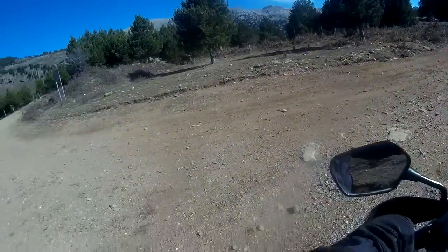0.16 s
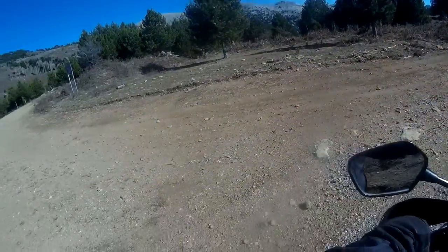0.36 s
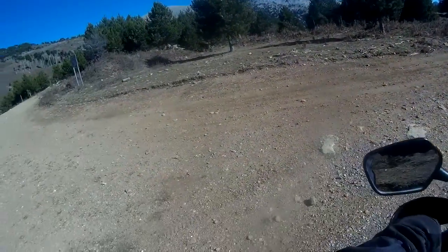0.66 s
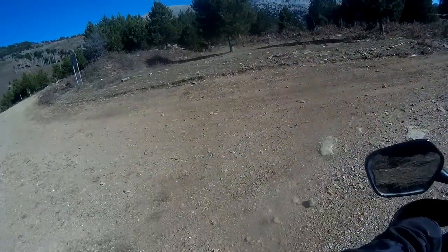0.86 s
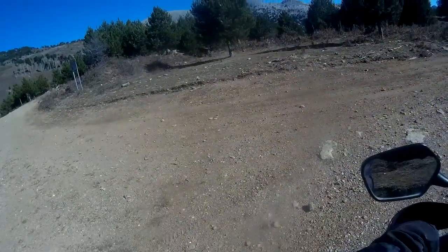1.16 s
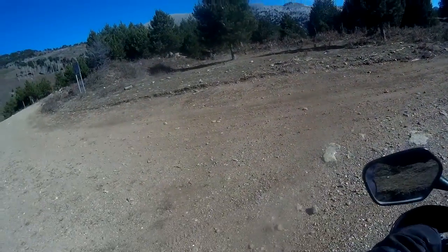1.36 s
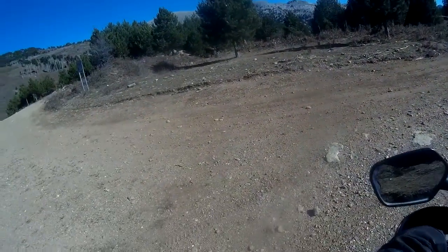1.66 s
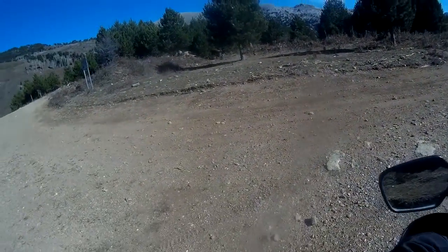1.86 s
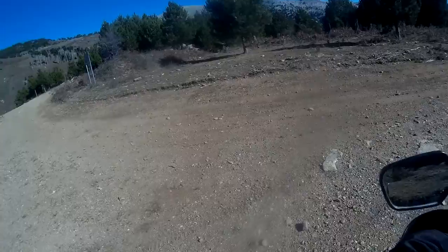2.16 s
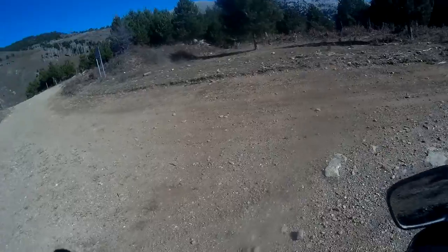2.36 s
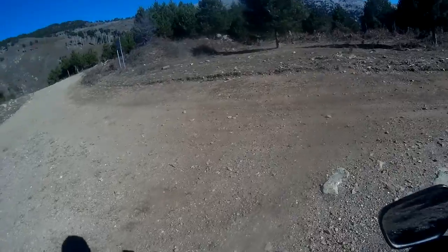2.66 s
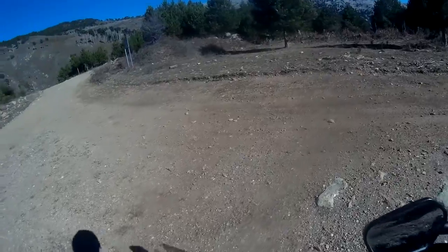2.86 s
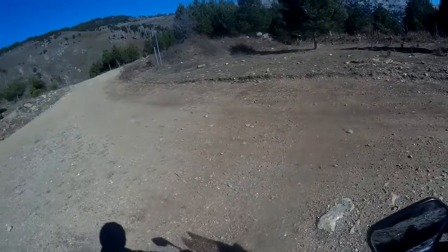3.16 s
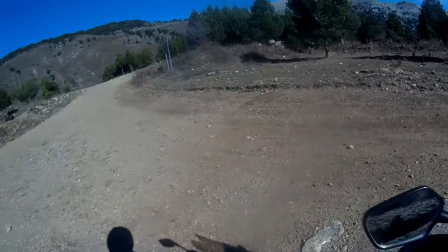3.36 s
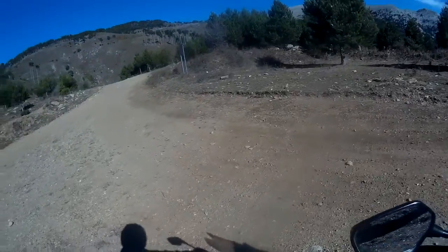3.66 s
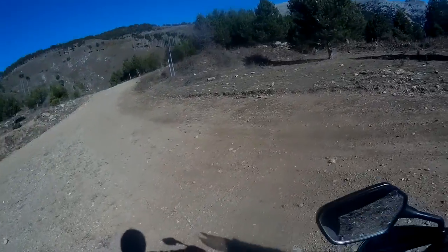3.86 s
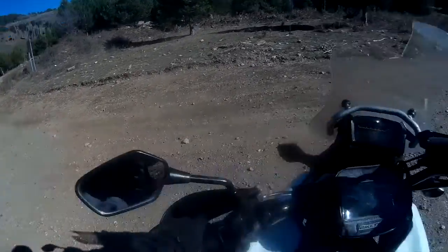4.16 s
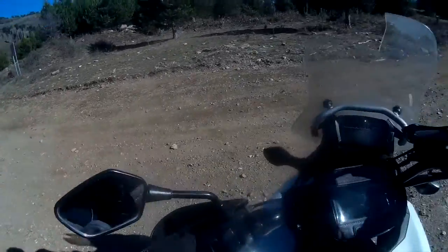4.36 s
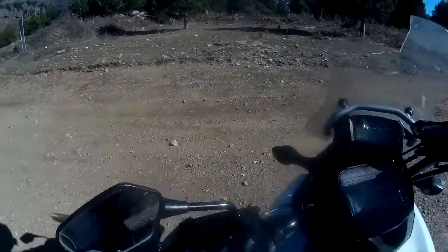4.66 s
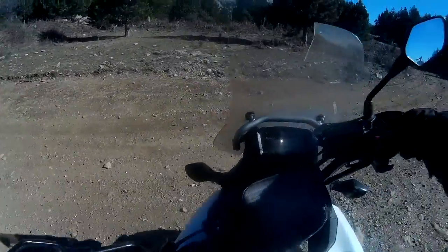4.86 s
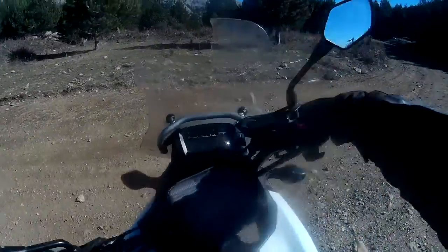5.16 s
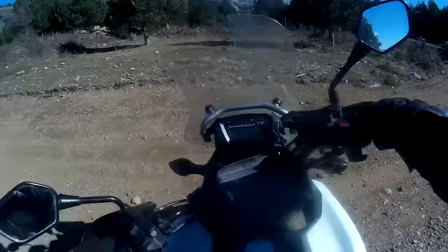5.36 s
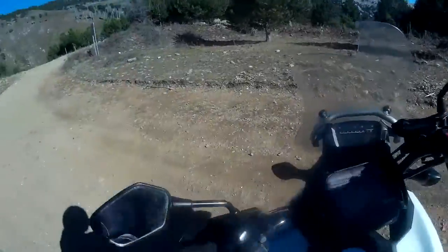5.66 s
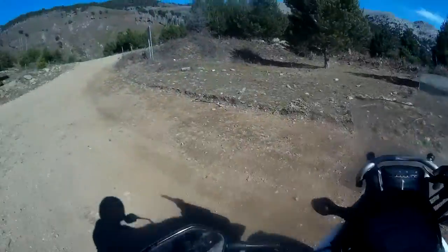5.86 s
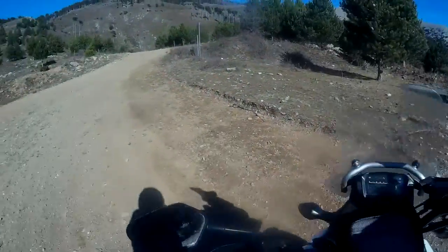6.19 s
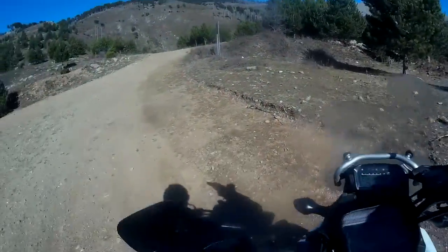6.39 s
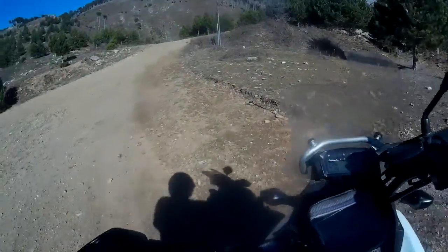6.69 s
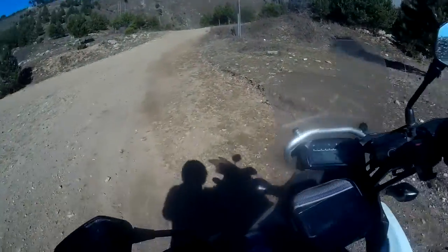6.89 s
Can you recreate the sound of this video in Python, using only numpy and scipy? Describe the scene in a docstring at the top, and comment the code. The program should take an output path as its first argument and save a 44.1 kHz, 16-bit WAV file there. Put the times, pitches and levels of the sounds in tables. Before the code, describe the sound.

Close from the rider's helmet, a twin-cylinder motorcycle turns slowly on an open dirt track. Its uneven, hollow exhaust beats swell in short throttle bursts, drop to a soft boom and swell again. Cases rattle, valves tick and gears whine faintly. Grit grinds under the tyres in the later half, the engine sags almost to a stall, then recovers with hard, overloaded thumps and settles lower.

```python
"""A twin-cylinder motorcycle turns round at walking pace on a dirt track, heard from the rider's helmet.
Its unevenly spaced firings ring the silencer, swell with the throttle and sag almost to a stall.
Pistons pump a deep boom, valves tick, cases rattle and gears whine, all timed by one engine cycle.
Tyres grind over grit as shaped noise with snaps; rumble and hiss lie beneath.
The hardest thumps overload the microphone."""
import sys
import numpy as np
from scipy import signal
from scipy.fft import rfft, irfft, next_fast_len
from scipy.io import wavfile
from scipy.ndimage import map_coordinates

SR = 44100
rng = np.random.default_rng(int(sys.argv[2]) if len(sys.argv) > 2 else 0)


def pcm_store(signal):
    """Save signal as 16-bit PCM."""
    levels = np.round(np.clip(np.atleast_2d(signal), -1, 1) * 32767)
    wavfile.write(sys.argv[1], SR, levels.astype(np.int16).T)


N = 310023  # length in samples


def amp(db):
    """Decibels to gain."""
    return 10 ** (np.asarray(db) / 20)


def unit(x):
    """Scale to rms 1."""
    return x / np.sqrt(np.mean(x ** 2) + 1e-20)


def curve(rows):
    """One value per sample, joined by straight lines from (t/s, value) rows."""
    return np.interp(np.arange(N) / SR, *np.transpose(rows))


def noise():
    """Fresh white noise."""
    return rng.standard_normal(N)


def wobble(rate):
    """A smooth random curve with rate knots a second."""
    knots = rng.standard_normal(int(N * rate / SR) + 4)
    return map_coordinates(knots, [np.arange(N) * rate / SR])


def filtered(x, response):
    """x times a complex response of frequency."""
    size = next_fast_len(N + SR // 2)
    return irfft(rfft(x, size) * response(np.fft.rfftfreq(size, 1 / SR)), size)[:N]


def coloured(x, spectrum):
    """x shaped by (f/Hz, level/dB) points on a log frequency axis, at rms 1."""
    hz, db = np.transpose(spectrum)
    return unit(filtered(x, lambda f: amp(np.interp(np.log(f + 1), np.log(hz), db))))


def resonances(modes, f):
    """Causal response of damped modes, summed; each peaks at its own centre frequency."""
    total = 0
    for centre, width, db, polarity in modes:
        damping = 1j * f * width
        total = total + np.sign(polarity) * amp(db) * damping / (centre * centre - f * f + damping)
    return total


def fading(pulses, life):
    """Each impulse swells within a millisecond or so, then dies away over life seconds."""
    rise = np.exp(-1 / (.001 * SR))
    tails = signal.lfilter([1], [1, -np.exp(-1 / (life * SR))], pulses)
    return signal.lfilter([1 - rise], [1, -rise], tails)


def swells(rows):
    """Gain of (start, end, dB, dB/s) gestures: each ramps up, holds and dies away; the loudest wins."""
    t = np.arange(N) / SR
    open_s = .18
    gestures = []
    for start, end, db, fall in rows:
        ramp = np.clip((t - start) / open_s, 0, 1)
        gestures.append(ramp * amp(db - fall * np.maximum(t - end, 0)))
    return np.max(gestures, axis=0)


# where in the four-stroke cycle (0-1) each cylinder fires
FIRST, SECOND = .596, .969


def strokes(cycle, place, scatter_db):
    """One impulse, of randomly scattered level, each time the four-stroke cycle passes a place (0-1)."""
    passes = np.diff(np.floor(cycle - place), prepend=np.floor(-place)) > 0
    return passes * amp(scatter_db * noise())


# crank speed through the turn: (t/s, speed/rpm)
CRANK_SPEED = [(0.0, 1513.0), (0.238, 1578.0), (0.932, 1093.0), (1.345, 1711.0), (1.543, 1614.0),
               (1.781, 1793.0), (2.101, 1747.0), (2.366, 1404.0), (3.05, 1660.0), (3.365, 1387.0),
               (4.045, 1403.0), (4.237, 1907.0), (4.73, 1831.0), (5.11, 1914.0), (5.465, 1763.0),
               (5.656, 905.0), (5.935, 1831.0), (6.257, 1157.0), (6.375, 1582.0), (7.03, 1590.0)]


def crank_rpm():
    """Crank speed at every sample; it paces the firings and the mechanical noise."""
    return curve(CRANK_SPEED)


# twists of the throttle: (opens t/s, closes t/s, firing level/dB, fall/dB per s)
THROTTLE_TWISTS = [(-.2, .18, -13.5, 105), (.99, 1.46, -10, 151.5), (1.4, 2.07, -5.5, 24.5),
                   (2.22, 3.14, -6, 182), (3.5, 3.68, -15.5, 66), (3.91, 4.2, -5.5, 5),
                   (4.42, 5.45, -5, 153.5), (5.63, 5.96, -4, 104), (6.18, 6.36, -4.5, 69),
                   (6.48, 7.03, -8.5, 151.5)]


def throttle_opening():
    """Throttle as a firing strength: each twist ramps up, holds and dies away."""
    return swells(THROTTLE_TWISTS)


def coasting():
    """Coasting with the fuel cut: 1 in the middle, 0 away from it."""
    middle_s, half_length_s = 3.44, 0.12
    return np.exp(-((np.arange(N) / SR - middle_s) / half_length_s) ** 4)


def driven(law, throttle):
    """Gain of an engine part, set by crank speed, throttle and coasting."""
    cruise_rpm = 1500
    db, speed_db, throttle_db, coast_db = law
    level = db + speed_db * np.log2(crank_rpm() / cruise_rpm)
    level = level + throttle_db * throttle / throttle.max()
    return amp(level + coast_db * coasting())


# single firings with a strength of their own, most of them hard kicks: (t/s, level/dB)
FIRING_KICKS = [(.387, -20.5), (.471, -29), (.557, -18.5), (.648, -15), (1.633, -5), (2.041, -4.5),
                (2.586, -5), (2.666, -5.5), (2.821, -5.5), (3.044, -5.5), (4.126, -4.5), (4.775, -4),
                (5.352, -4.6), (5.419, -5), (5.57, -20), (5.817, -3.5), (5.866, -4.5), (5.894, -5.5),
                (5.936, -4), (6.08, -14.5)]


def firings(cycle, throttle, idle_db, second_db, scatter_db, coast_db):
    """The second cylinder fires about 270 crank degrees after the first, a little weaker."""
    strength = np.maximum(throttle, amp(idle_db + coast_db * coasting()))
    first = strokes(cycle, FIRST, scatter_db)
    second = amp(second_db) * strokes(cycle, SECOND, scatter_db)
    blows = strength * (first + second)
    fired = np.flatnonzero(blows)
    for s, db in FIRING_KICKS:
        nearest = fired[np.argmin(np.abs(fired - s * SR))]
        blows[nearest] = amp(db)
    return blows


# silencer resonances: (f/Hz, width/Hz, level/dB, polarity)
SILENCER_MODES = [(54.7, 19.2, 52.5, -1), (76, 59, 48.5, 1), (113.95, 27.2, 48.5, 1),
                  (199.4, 160, 39.5, -1), (280.9, 106, 55.5, 1), (307.7, 50.1, 66, -1),
                  (410.3, 88.8, 63.5, 1), (527, 102, 60, -1)]
# colour of the turbulent puff: (f/Hz, relative level/dB)
PUFF_COLOUR = [(150, -3), (220, 1), (400, -0.5), (510, 4.5), (640, -12), (900, -11.5), (1500, -20),
               (2500, -30), (5000, -56.5)]


def exhaust(blows, soft_hz, edge, puff_db, puff_life):
    """Each rounded gas pulse rings the silencer and leaves it with a turbulent puff."""
    opening = .003  # s; the pulse starts to rise as the exhaust valve opens, ahead of the main rush of gas

    def pulse(f):
        return np.exp(-(f / soft_hz) ** edge + 2j * np.pi * f * opening)

    thump = filtered(blows, lambda f: pulse(f) * resonances(SILENCER_MODES, f))
    puff = fading(blows, puff_life) * coloured(noise(), PUFF_COLOUR)
    return thump + amp(puff_db) * puff


# resonances of the air that the pistons pump: (f/Hz, width/Hz, relative level/dB, polarity)
PUMPED_AIR_MODES = [(48.13, 10.9, 1.5, 1), (104, 8.7, -8, -1)]
# boom law: (level/dB at cruise, dB per doubling of speed, dB added at full throttle, dB added coasting)
PUMPING_LAW = (-27, -2, -5, -19)


def pumping(cycle, throttle, soft_hz, second_db):
    """Even with the throttle shut the pistons push air, one more than the other: a soft, deep boom."""
    pushes = strokes(cycle, FIRST, scatter_db=1) + amp(second_db) * strokes(cycle, SECOND, scatter_db=1)
    boom = filtered(pushes, lambda f: np.exp(-(f / soft_hz) ** 2) * resonances(PUMPED_AIR_MODES, f))
    return driven(PUMPING_LAW, throttle) * unit(boom)


# broad colour of the case rattle: (f/Hz, relative level/dB)
CASE_COLOUR = [(150, -18.5), (300, 4.5), (450, 3), (540, -7), (620, -1.5), (710, -9.5), (820, -5),
               (930, -9.5), (1080, -10), (1400, -17.5), (2300, -19.5), (3000, -33), (4400, -37.5),
               (6000, -58)]
# engine case panels that the rattle rings: (f/Hz, width/Hz, relative level/dB, polarity)
PANEL_MODES = [(599.6, 50, 6, 1), (835, 40, 2.5, -1), (1080, 47, -0.5, 1), (1342, 27, -4.5, -1),
               (1570, 40, -7, 1), (1960, 50, -10.5, -1)]
# light clunks as the drive train goes slack and takes up again: (t/s, level/dB before the case gains)
DRIVE_CLUNKS = [(3.486, -30), (3.598, -35.5)]
# rattle law before the case gains: columns as in the boom law
RATTLE_LAW = (-44.5, 3, 2.5, -3.5)


def case_rattle(cycle, throttle, clatter_db, panel_db, throb, clunk_life):
    """Fluttering noise rattles the cases and rings their panels, throbbing twice a cycle; clunks burst in."""
    knocks = np.zeros(N)
    for s, db in DRIVE_CLUNKS:
        knocks[round(s * SR)] = amp(db)
    beat = 1 + throb * np.cos(4 * np.pi * (cycle - FIRST))
    level = driven(RATTLE_LAW, throttle) * beat + fading(knocks, clunk_life)

    def rattle():
        return noise() * amp(2.5 * wobble(160))

    panels = unit(filtered(rattle(), lambda f: resonances(PANEL_MODES, f)))
    return level * (amp(clatter_db) * coloured(rattle(), CASE_COLOUR) + amp(panel_db) * panels)


# gears whining as they take up the drive: (starts t/s, ends t/s, level/dB before flutter, fall/dB per s)
GEAR_WHINES = [(1.0, 1.4, -54.5, 41), (3.6, 5.42, -52.5, 100), (6.3, 7.03, -53.5, 100)]


def gear_whine(cycle, teeth):
    """Gear teeth meshing make a tone of teeth times the crank rate, unsteady in level and pitch."""
    mesh = np.sin(4 * np.pi * teeth * cycle + 1.6 * wobble(60))  # two crank turns a cycle
    return swells(GEAR_WHINES) * amp(4.7 * wobble(30)) * mesh


# valve gear ringing, applied twice over: (f/Hz, width/Hz, relative level/dB per pass, polarity)
HEAD_COVER_MODES = [(2260, 230, 3, 1), (3700, 750, -1, -1), (4344, 640, -2, 1)]
# valve gear law before the tick and rustle gains: columns as in the boom law
VALVE_LAW = (-64.5, 5.5, 3, -6)


def valves(cycle, throttle, tick_db, rustle_db, place):
    """Valves seat ahead of each firing and ring the head cover; their train rustles steadily beneath."""
    first = strokes(cycle, place, scatter_db=2)
    second = .45 * strokes(cycle, place + SECOND - FIRST, scatter_db=2)
    chatter = noise() * fading(first + second, life=.007)

    def cover(x):
        return unit(filtered(x, lambda f: resonances(HEAD_COVER_MODES, f) ** 2))

    sound = amp(tick_db) * cover(chatter) + amp(rustle_db) * cover(noise())
    return driven(VALVE_LAW, throttle) * sound


# tyre on grit: (t/s, level/dB before a slight wobble)
GRIT_LEVEL = [(0, -57.5), (3.95, -58), (4.25, -45.5), (5, -41.5), (5.4, -44.5), (5.6, -51), (7.03, -46)]
# colour of the grinding: (f/Hz, relative level/dB)
TYRE_COLOUR = [(300, -11.5), (600, 6), (1000, -11.5), (1400, 4), (1900, -3.5), (2500, -23), (3100, -24),
               (3800, -17.5), (4400, -36), (5200, -45), (9000, -58)]


def tyres(grain_db, stones):
    """Grit grinds under the wheels: dense scraping with small stones (per second) snapping in it."""
    snaps = (rng.random(N) < stones / SR) * noise() * amp(grain_db * noise())
    grinding = coloured(noise() + 2.3 * unit(snaps), TYRE_COLOUR)
    return amp(curve(GRIT_LEVEL) + 0.52 * wobble(8.5)) * grinding


# colour of the rumble round the helmet: (f/Hz, relative level/dB)
RUMBLE_COLOUR = [(15, -12.5), (35, 2), (100, 6), (190, -14.5), (300, 2), (500, -26.5), (900, -53)]
# colour of the microphone hiss: (f/Hz, relative level/dB)
HISS_COLOUR = [(200, -4.5), (4000, -9), (7000, -9.5), (15000, -9.5)]


def air(rumble_db, hiss_db):
    """A light, wavering rumble round the helmet and the microphone's steady hiss."""
    rumble = amp(rumble_db + 1.5 * wobble(6.3)) * coloured(noise(), RUMBLE_COLOUR)
    return rumble + amp(hiss_db) * coloured(noise(), HISS_COLOUR)


def scene():
    """A four-stroke cycle of two crank turns times the engine; the throttle sets how hard it works."""
    cycle = np.cumsum(crank_rpm()) / (120 * SR)
    throttle = throttle_opening()
    blows = firings(cycle, throttle, idle_db=-28.5, second_db=-2.34, scatter_db=0.27, coast_db=-17)
    engine = exhaust(blows, soft_hz=215.95, edge=1.893, puff_db=-29.5, puff_life=0.016)
    engine = engine + pumping(cycle, throttle, soft_hz=194, second_db=-2)
    rattle = case_rattle(cycle, throttle, clatter_db=2.0, panel_db=-4.0, throb=0.027, clunk_life=0.0036)
    whine = gear_whine(cycle, teeth=42)
    ticks = valves(cycle, throttle, tick_db=0.0, rustle_db=-6.5, place=.32)
    background = tyres(grain_db=1.5, stones=580) + air(rumble_db=-35.0, hiss_db=-75.0)
    return (engine + rattle + whine + ticks + background)[None]


def saturate(x, top, knee):
    """Level off towards top; a larger knee makes a sharper corner."""
    return x / (1 + np.abs(x / top) ** knee) ** (1 / knee)


def record(dry):
    """The microphone rounds off tall crests and flattens deep troughs, then cuts all above its band limit."""
    top_hz = 15700
    crests = saturate(dry[0], top=0.59, knee=7.5)
    troughs = saturate(dry[0], top=.707, knee=420)
    overloaded = np.where(dry[0] > 0, crests, troughs)
    return filtered(overloaded, lambda f: f < top_hz)[None]


dry = scene()
out = record(dry)
pcm_store(out)
```